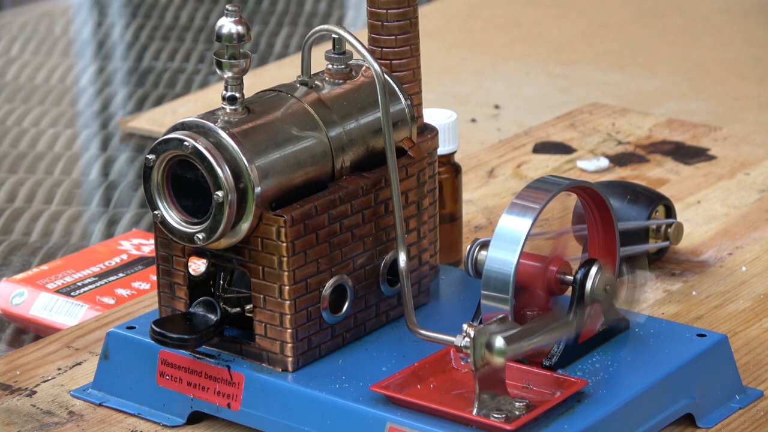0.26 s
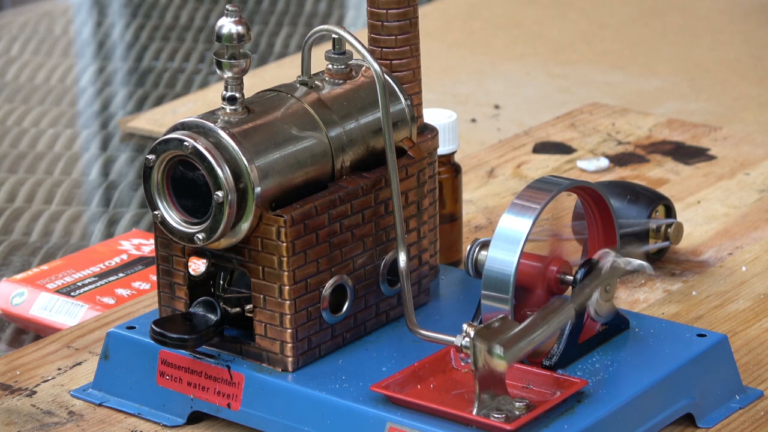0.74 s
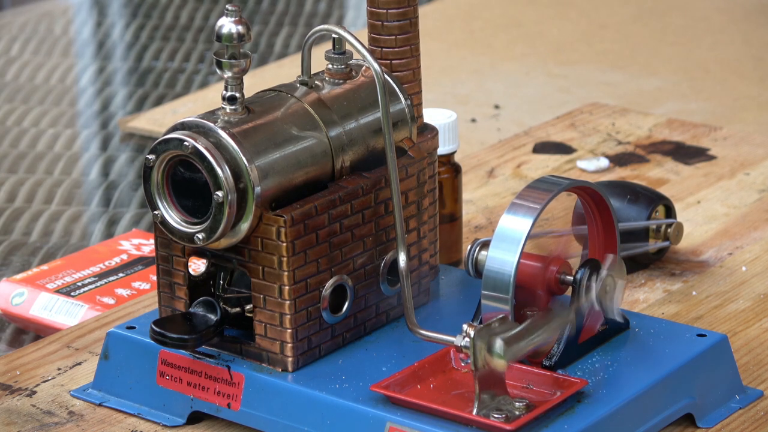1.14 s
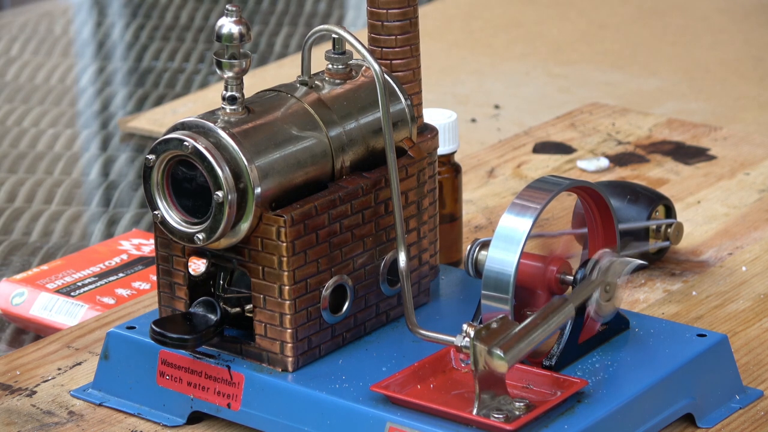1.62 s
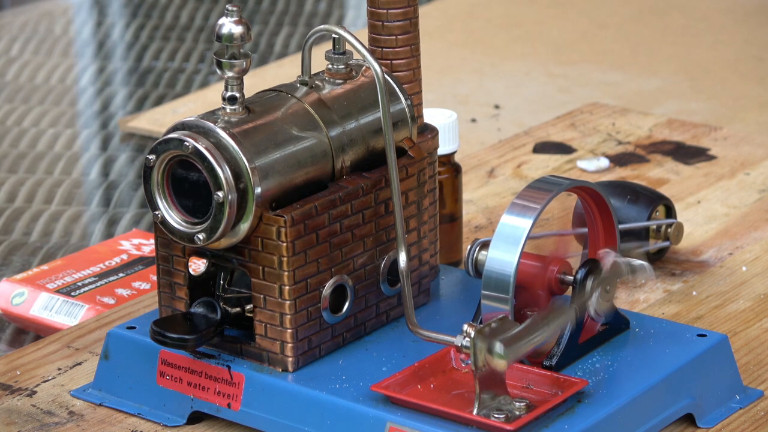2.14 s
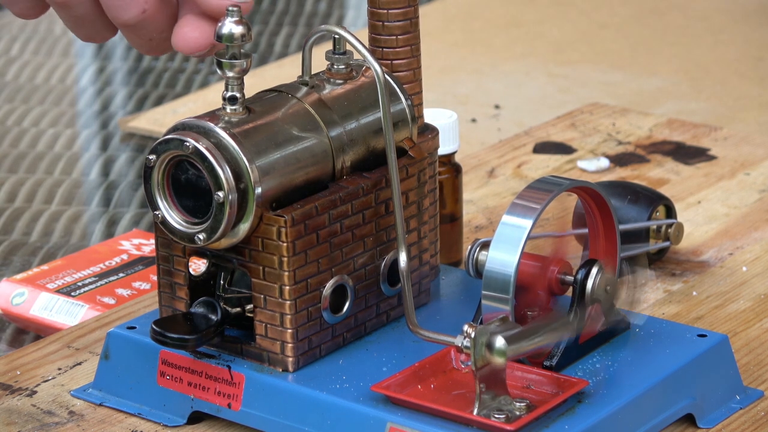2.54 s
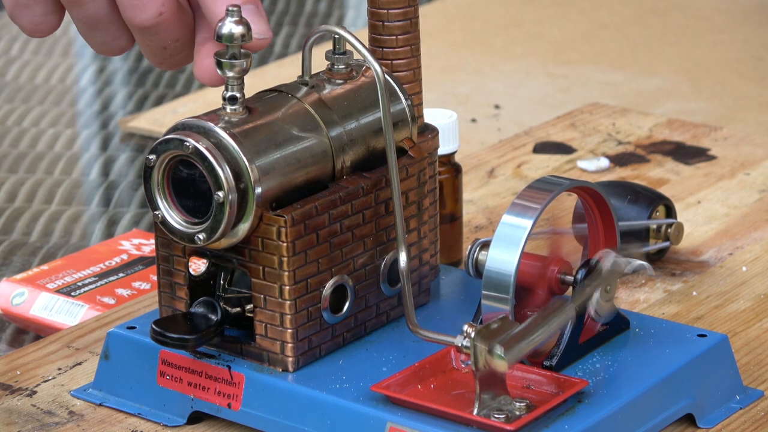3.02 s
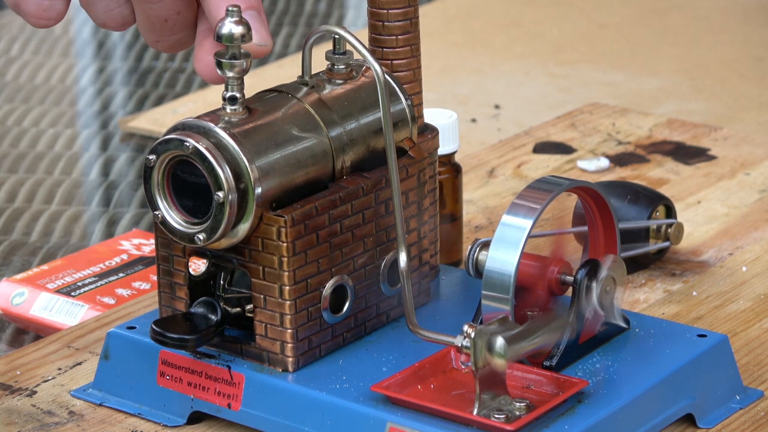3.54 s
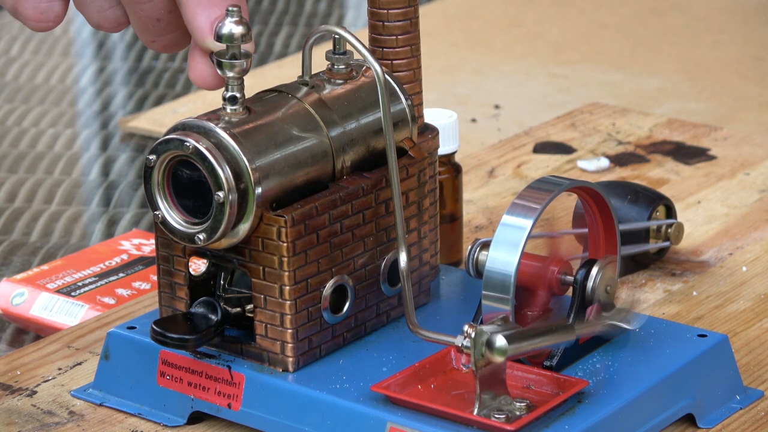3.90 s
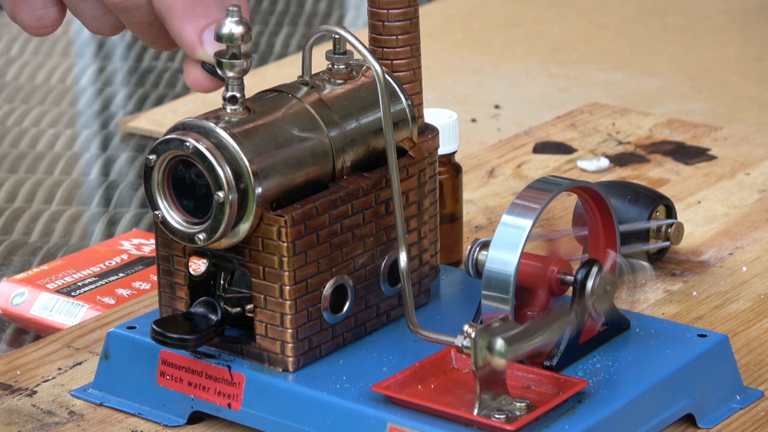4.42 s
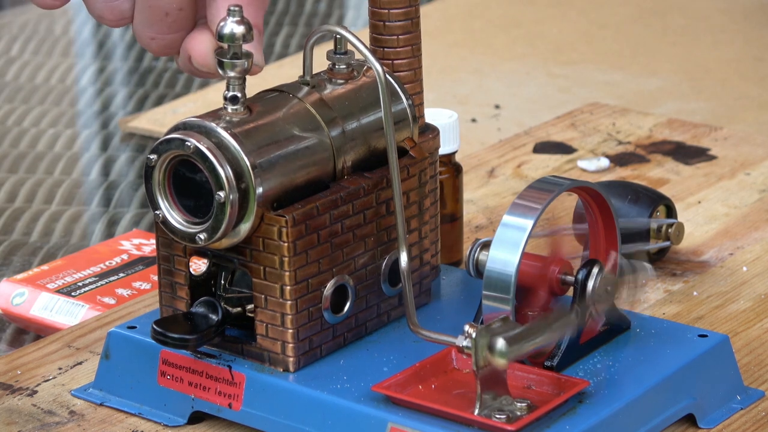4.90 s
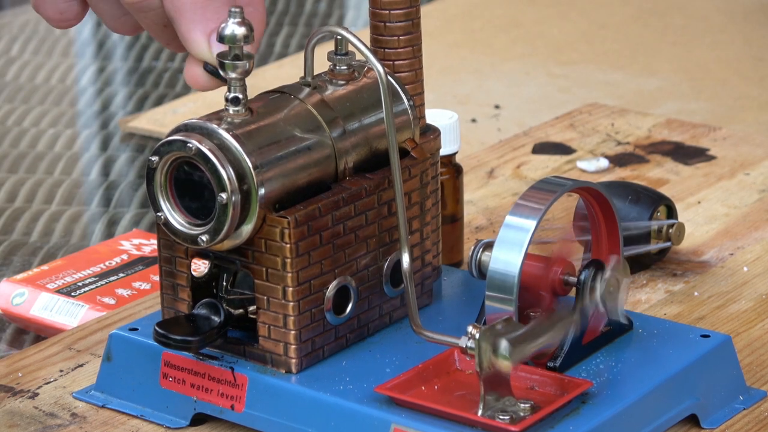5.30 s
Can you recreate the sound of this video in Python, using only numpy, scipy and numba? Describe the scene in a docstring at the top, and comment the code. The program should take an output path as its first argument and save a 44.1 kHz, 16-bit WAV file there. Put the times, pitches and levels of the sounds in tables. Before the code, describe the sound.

Close to the microphone, a little steam engine rattles rapidly on its ringing tin base, puffing steam with every turn and gathering speed, with a few harder knocks. After about four seconds come two short, loud, very high whistle blasts, breathy and unsteady in pitch, which push the clatter into the background. The workbench hums faintly throughout, and the workshop adds only short reflections.

```python
"""A fast, tinny clatter: a model steam engine with an oscillating cylinder gathers speed on a workbench.
Each turn, a crank-pin knock, a piston scrape and a pivot tick ring the tin base, and the exhaust puffs.
Late on, the boiler whistle is opened twice: a shrill, unsteady tone over hiss. It bleeds the boiler,
so the wheel slows a little, and a close camera's limiter pushes the engine down under the blasts.
Behind it all sit a low bench drone, short reflections and the faint air of the workshop."""
import sys
import numpy as np
from scipy import signal
from scipy.fft import rfft, irfft
from scipy.io import wavfile
from scipy.ndimage import minimum_filter1d
from numba import njit

SR = 44100
rng = np.random.default_rng(int(sys.argv[2]) if len(sys.argv) > 2 else 0)


def unload_wav(signal):
    """Save mono or channel-first audio to the path in sys.argv[1] as 16-bit WAV at rate SR, clipped to [-1, 1]."""
    wavfile.write(
        sys.argv[1],
        SR,
        np.round(np.clip(np.atleast_2d(signal).T, -1, 1) * 32767).astype(np.int16),
    )


N = 245195
T = np.arange(N) / SR
FREQ = np.maximum(np.fft.rfftfreq(2 * N, 1 / SR), 1)
SIDE = np.array([[1], [-1]])  # adds to the left, takes from the right
START_TPS, FULL_TPS, TOP_TPS = 15.298, 19.0, 19.9093  # turns/s: at first, hardest clatter, run-up target


# accents where the crank pin slams: t/s, boost of the frame's ring/dB
PIN_SLAMS = [(.62, 6), (.864, 11), (.985, 11), (1.919, 6.5), (2.031, 8), (2.2, 8), (2.257, 9.5), (3.141, 7),
             (3.195, 5.5), (5.219, 7)]
# the pin's own bright ping: f/Hz, width/Hz, level/dB
PIN_MODES = [(930, 300, -5), (2290, 380, -3), (3880, 260, 0), (5530, 340, 0)]
# EQ of the mid-heavy knock: f/Hz, level/dB
KNOCK_EQ = [(60, -23.5), (200, -8), (550, -3), (850, 1), (1500, 7), (2300, 1), (2900, -1), (4000, -7.5),
            (5600, 1.5), (8000, -1), (11000, 0), (15500, -51)]

def crank(turns, speed, body):
    """The pin chatters across its play as the load reverses, then seats with a ping and rings the frame."""
    knock_db = 4.5 - 1.07 * (FULL_TPS - speed) ** 2
    slam_db = sum(db * np.exp(-((T - s) / .059) ** 4) for s, db in PIN_SLAMS)
    late = turns - .012 * (speed - 16)  # a faster wheel turns further before the pin lands
    chatter = stroke(late, at=.8275, rise=.045, fall=.087, scatter_db=2, slack=.0065)
    chatter *= grit(turns, spread_db=2.5, repeat_hz=854) * undb(.47 * knock_db + .24 * slam_db)
    ring = frame_ring(kicks(late, at=.81, scatter_db=.5) * undb(knock_db + slam_db))
    pin = sum(undb(db) * resonance(hz, width) ** 3 for hz, width, db in PIN_MODES)
    ping = unit(through(kicks(late, at=.808, scatter_db=2), pin))
    clean_landing = (1 - np.tanh(2 * (speed - 16.1))) / 2  # near 1 while the wheel is slow
    ping_db = -58.5 + 13 * clean_landing
    return contact(chatter, KNOCK_EQ, body, db=-31.5) + undb(-44.5) * ring + undb(ping_db) * ping


# EQ of the raspy scrape: f/Hz, level/dB
SCRAPE_EQ = [(60, -47), (200, -23), (550, -5.5), (800, -18), (1100, 9.5), (1500, 1.5), (2700, -3.5),
             (3900, 4.5), (6500, 2), (9000, 1.5), (12000, -35), (15500, -19)]

def piston(turns, load_db, body):
    """The piston scrapes once a turn, on its way out."""
    scrape = stroke(turns, at=.464, rise=.075, fall=.17, scatter_db=1.5, slack=.013)
    scrape *= grit(turns, spread_db=3, repeat_hz=900)
    return contact(scrape * undb(load_db), SCRAPE_EQ, body, db=-32.5)


# EQ of the dry tick: f/Hz, level/dB
TICK_EQ = [(60, -15), (200, -16), (550, -12), (850, 3.5), (1200, -5.5), (1600, 1), (2700, -8.5),
           (4200, -5.5), (6500, 1.5), (9000, -14), (12000, -3), (15500, -22)]

def pivot(turns, load_db, body):
    """The pivot ticks once a turn; under load it hits hard enough to ring the frame too."""
    tick = stroke(turns, at=.59, rise=.06, fall=.11, scatter_db=1.3, slack=.015)
    tick *= grit(turns, spread_db=3.5, repeat_hz=900)
    ring = frame_ring(kicks(turns, at=.59, scatter_db=4) * undb(2 * load_db))
    return contact(tick * undb(1.5 * load_db), TICK_EQ, body, db=-30.5) + undb(-46) * ring


# EQ of the dull grind: f/Hz, level/dB
BEARING_EQ = [(30, -40), (70, -12.5), (120, -10.5), (190, -4), (550, -4.5), (780, 2.5), (1100, -1.5),
              (1500, 1), (2100, -2), (2800, 1), (4000, -8.5), (6500, -12.5), (11000, -17), (15500, -36)]

def bearings(turns, load_db, body):
    """The bearings grind all the way round, keeping the frame's ring alive between blows."""
    sustain = frame_ring(rng.standard_normal(N) * undb(load_db))
    grind = grit(turns, spread_db=2, repeat_hz=990) * undb(.21 * load_db)
    return contact(grind, BEARING_EQ, body, db=-40.5) + undb(-50.5) * sustain


# tinny resonances of base, boiler and frame: f/Hz, width/Hz, level/dB
BODY_MODES = [(226.7, 28.4, 3.5), (381, 52, 0.5), (461, 33, 5), (737, 32, 4.5), (912, 310, -4),
              (1111, 91, 13), (1237.5, 45, 13.5), (1473, 51, 15), (1561, 66, 13), (1733, 81, 10.5),
              (1906, 83, 14), (2104, 115, -2), (2215, 64, 6), (3025, 51, 2.5), (3313, 81, 5),
              (3747, 227, 10.5), (3917, 133, 11.5), (4330, 79, 11.5), (4830, 88, 6), (5360, 360, 3),
              (7450, 120, 7.5), (7850, 260, 3.5)]

def tin_body():
    """Response of the base: its modes over a broad rattle."""
    return 1 + sum(undb(db) * resonance(hz, width) for hz, width, db in BODY_MODES)


def frame_ring(force):
    """The frame rings through coupled parts, so each blow swells briefly and beats as it fades."""
    return unit(through(force, resonance(1478, 80) * resonance(1545, 80) * resonance(1520, 300)))


# EQ of the bright steam puff: f/Hz, level/dB
PUFF_EQ = [(300, -34), (1200, -19), (2800, -50), (4000, -3.5), (5500, 0.5), (6700, -1), (7800, 5.5),
           (9300, -0.5), (11500, 1.5), (13500, -4.5), (15500, -12)]
# EQ of the thin sizzle at the port face: f/Hz, level/dB
LEAK_EQ = [(4000, -19), (8000, -6), (11000, -1), (13500, -1), (15500, -6)]

def exhaust(turns):
    """The port puffs once a turn over a steady leak; the spreading jet gives a little stereo width."""
    opening = stroke(turns, at=.26, rise=.14, fall=.12, scatter_db=.57, slack=.0048)
    puffs = opening * wide_noise(PUFF_EQ, side_db=-11) * undb(-32 - .31 * SIDE)
    return puffs + undb(-57) * wide_noise(LEAK_EQ, side_db=-2)


# whistle cues: valve cracks t/s, pipe speaks t/s, jet locks t/s, valve shuts t/s, attack/s,
# weak tone before the lock f/Hz, its level/dB, pan as left minus right/dB
BLASTS = [(4.072, 4.167, 4.239, 4.702, 0.0067, 4920, -10.5, 0.2),
          (5.283, 5.31, 5.391, 5.7, .013, 5103, -8.5, 2)]
# pitch curve of each locked note, sagging and recovering with the pressure: t/s, f/Hz
PITCH_CURVES = [
    [(4.245, 5085), (4.345, 5002), (4.463, 5220), (4.7, 5204)],
    [(5.395, 5214), (5.465, 4983), (5.487, 5115), (5.55, 5180)],
]
# brief dips in the tone: t/s, depth/dB, half length/s
FALTERS = [(4.208, 7, 0.013), (4.375, 7, 0.0019), (4.413, 9, .003), (4.428, 10, 0.0036), (5.445, 4, 0.0017),
           (5.497, 15, 0.0018), (5.517, 7.5, 0.0077)]
# EQ of the pipe's breath: f/Hz, level/dB
HISS_EQ = [(1500, -19.5), (3000, -15), (4300, -10), (5150, 7), (6000, 0), (6600, -5.5), (7750, 1),
           (9000, -4.5), (10200, -2), (11500, -28), (13200, -11), (15500, -18)]

def whistle(blast, pitch_curve):
    """The valve leaks, the pipe scoops up to a weak flat tone, then the jet locks on to a near sine."""
    cracks, speaks, locks, shuts, attack_s, weak_hz, weak_db, pan_db = blast
    edge_hz, full_hz = 4760, 5215  # breathy edge tone; note at full pressure
    locked, shut = settle(locks, .001), settle(shuts, .00098)
    opened = np.clip(since(cracks) / (speaks - cracks), 0, 1)
    scoop_hz = edge_hz - 600 * (1 - opened) + (weak_hz - edge_hz) * settle(speaks, .0042)
    note_hz = np.interp(T, *np.transpose(pitch_curve))
    hz = scoop_hz + locked * (note_hz - scoop_hz) - 500 * shut
    note_db = -1.5 - .009 * (full_hz - note_hz)  # the note weakens as it goes flat
    tone_db = weak_db + locked * (note_db - weak_db)
    strength = undb(-33.5) + undb(tone_db) * settle(speaks, attack_s)  # edge tone plus pipe
    rough = np.clip(strength ** -.7, 1, 2.5)  # a weakly blown pipe is rougher
    jitter_hz = rough * (7 * walk(89.3) + 17 * walk(600))
    phase = 2 * np.pi * np.cumsum(hz + jitter_hz) / SR
    tone = np.sin(phase) + undb(-37) * np.sin(2 * phase) + undb(-51) * np.sin(3 * phase)
    hiss = unit(through(rng.standard_normal(N), colour(HISS_EQ)))
    falter_db = sum(db * np.exp(-((T - s) / length) ** 2) for s, db, length in FALTERS)
    tone *= strength * undb(.52 * rough * walk(240) - falter_db)
    valve = opened ** 2 * (1 - shut)
    return valve * (tone + undb(-34.5) * hiss) * undb(pan_db / 2 * SIDE)


def flywheel(run_up_s=2.8038, bleed_tps_per_s=.1193):
    """Turns per second: the wheel runs up until the whistle first takes its steam, then slows."""
    bled_s = since(BLASTS[0][1])
    return TOP_TPS - (TOP_TPS - START_TPS) * np.exp(-(T - bled_s) / run_up_s) - bleed_tps_per_s * bled_s


def drone(turns, speed):
    """The rocking cylinder shakes the bench at multiples of the turn rate; two faint tones hum above."""
    bench = resonance(74.4, 2.8) + undb(1) * resonance(155.4, 6.8)
    shake = unit(through(kicks(turns, at=1, scatter_db=3.5), bench))
    # a sharp mode hums each time a multiple sweeps across it, less as the wheel gets faster
    hum = unit(through(kicks(turns, at=1, scatter_db=1), resonance(307, 6) ** 2))
    hum_db = -61.5 - 3 * (speed - START_TPS)
    # the 22nd multiple swells as it climbs onto a mode of the base
    overtone = through(np.sin(2 * np.pi * 22 * turns), resonance(413, 20))
    return undb(-72) * shake + undb(hum_db) * hum + undb(-57.5) * overtone


def wall_echo(x, delay_s, db):
    """One wall throws back a single slap."""
    return undb(db) * through(x, np.exp(-2j * np.pi * FREQ * delay_s))


def workshop(x, wet_db, t60, side_hz):
    """Short reflections off bench and walls, wide in the treble and centred in the bass."""
    tail = rng.standard_normal((2, N)) * np.exp(-np.log(1000) * T / t60) * (T > .004)
    mid, side = rfft(tail / np.sqrt(np.sum(tail[0] ** 2)), 2 * N)
    side *= FREQ ** 2 / (FREQ ** 2 + side_hz ** 2)
    return undb(wet_db) * through(x, mid + side * SIDE)


# EQ of the dark room tone: f/Hz, level/dB
AIR_EQ = [(20, -31), (55, -8.5), (150, -3), (200, 3), (400, -8.5), (2000, -25)]

def room_tone():
    """The faint low air of the workshop, swelling slowly."""
    return wide_noise(AIR_EQ, side_db=-18) * undb(-73 + 2 * walk(2.4))


def stroke(turns, at, rise, fall, scatter_db, slack):
    """A swell and decay once a turn, varying in strength and angle; at, rise, fall, slack in turns."""
    size, shift = rng.standard_normal((256, 2)).T
    angle = turns - at + 1
    count = np.floor(angle + .25).astype(int)
    past_peak = angle - count - slack * shift[count]
    envelope = np.exp(np.where(past_peak < 0, -(past_peak / rise) ** 2, -abs(past_peak) / fall))
    return undb(scatter_db * size[count]) * envelope


def kicks(turns, at, scatter_db):
    """One impulse each time the crank passes the given angle."""
    count = np.floor(turns - at)
    return np.diff(count, prepend=count[0]) * undb(scatter_db * rng.standard_normal(N))


def grit(turns, spread_db, repeat_hz):
    """Metal on metal: coarse surface bumps come back every turn, the fine grains are always new."""
    bumps = irfft(np.exp(2j * np.pi * rng.random(1200)))  # all bump lengths equally strong
    worn = unit(np.interp(turns % 1 * len(bumps), np.arange(len(bumps)), bumps))
    grains = unit(rng.standard_normal(N) * undb(spread_db * rng.standard_normal(N)))
    share = .6 / (1 + (FREQ / repeat_hz) ** 4)
    return through(worn, np.sqrt(share)) + through(grains, np.sqrt(1 - share))


def contact(force, eq, body, db):
    """A contact force, shaped by its EQ, rings the body."""
    response = colour(eq) * body
    return undb(db) * through(force, response / np.sqrt(np.mean(abs(response) ** 2)))


def wide_noise(eq, side_db):
    """Coloured stereo noise; side_db sets the width."""
    mid, side = unit(through(rng.standard_normal((2, N)), colour(eq)))
    return mid + undb(side_db) * side * SIDE


def resonance(hz, width):
    """Response of one mode, gain 1 at its centre."""
    return 1 / (1 + 1j * hz / width * (FREQ / hz - hz / FREQ))


def colour(eq):
    """Causal frequency response through (f/Hz, level/dB) points."""
    hz, db = np.transpose(eq)
    cepstrum = irfft(np.log(undb(np.interp(np.log(FREQ), np.log(hz), db))))
    cepstrum[1:N] *= 2
    return np.exp(rfft(cepstrum[:N], 2 * N))


def through(x, response):
    """Filter by a frequency response."""
    return irfft(rfft(x, 2 * N) * response)[..., :N]


def walk(rate):
    """Smooth random drift of rms 1 that changes about rate times a second."""
    return unit(through(rng.standard_normal(N), 1 / (1 + (FREQ / rate) ** 4)))


def since(s):
    """Seconds since a moment, zero before it."""
    return np.maximum(T - s, 0)


def settle(s, time_s):
    """Goes from 0 to 1 after a moment, with a time constant."""
    return 1 - np.exp(-since(s) / time_s)


def undb(db):
    """Decibels to gain."""
    return 10 ** (np.asarray(db) / 20)


def unit(x):
    """Scale to rms 1."""
    return x / np.sqrt(np.mean(x ** 2))


@njit
def follow(x, attack, release):
    """Level follower with rise and fall times in seconds."""
    out, level = np.empty(len(x)), 0.
    for i in range(len(x)):
        level += (x[i] - level) / (1 + SR * (attack if x[i] > level else release))
        out[i] = level
    return out


def scene():
    """Engine and whistle in the workshop; the wheel's speed sets how hard the parts knock and scrape."""
    speed = flywheel()
    turns = np.cumsum(speed) / SR + .0684
    load_db = -.34 - .56 * (FULL_TPS - speed) ** 2
    body = tin_body()
    engine = crank(turns, speed, body) + piston(turns, load_db, body) + pivot(turns, load_db, body)
    engine = engine + bearings(turns, load_db, body) + exhaust(turns) + drone(turns, speed)
    whistles = sum(whistle(blast, curve) for blast, curve in zip(BLASTS, PITCH_CURVES))
    echo = wall_echo(whistles, delay_s=.02, db=-21.5)
    engine_room = workshop(engine.mean(axis=0), wet_db=-14, t60=.14, side_hz=4860)
    whistle_room = workshop(whistles.mean(axis=0), wet_db=-19, t60=.17, side_hz=2000)
    return engine + whistles + echo + engine_room + whistle_room + room_tone()


def record(dry, threshold_db=-11.5, top_hz=15750):
    """A quick limiter holds the peaks, a slow stage ducks long after a blast, and a steep high cut ends."""
    peak = -minimum_filter1d(-abs(dry).max(axis=0), size=48)
    quick = follow(peak, attack=.0002, release=.007)
    slow = undb(-1.5) * follow(quick, attack=.13, release=2.5)
    gain = 1 / np.maximum(1, np.maximum(quick, slow) / undb(threshold_db))
    return signal.sosfilt(signal.ellip(10, .2, 80, top_hz, fs=SR, output="sos"), dry * gain)


dry = scene()
out = record(dry)
unload_wav(out)
```